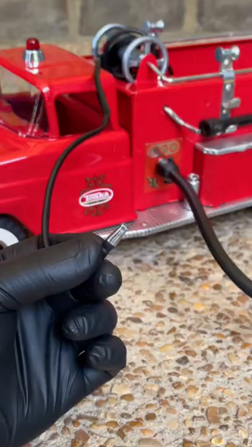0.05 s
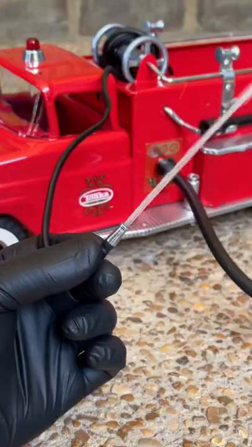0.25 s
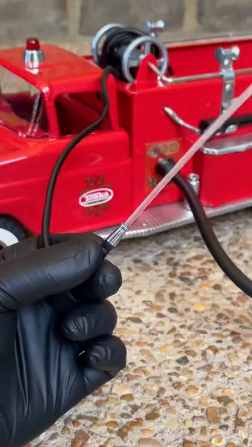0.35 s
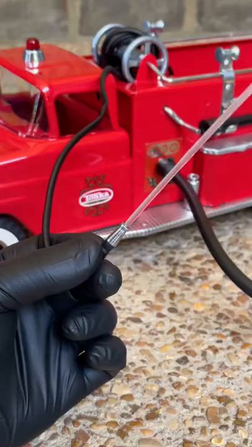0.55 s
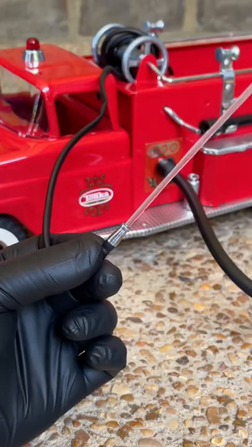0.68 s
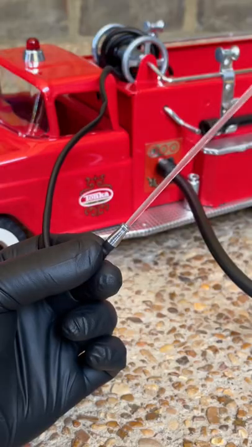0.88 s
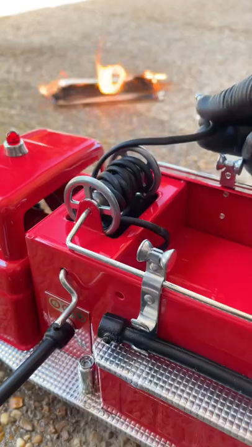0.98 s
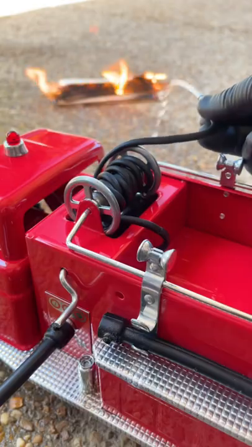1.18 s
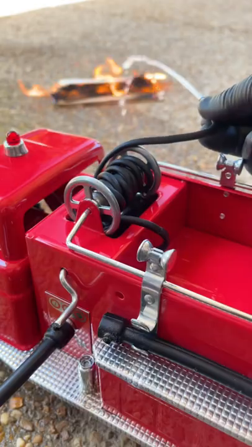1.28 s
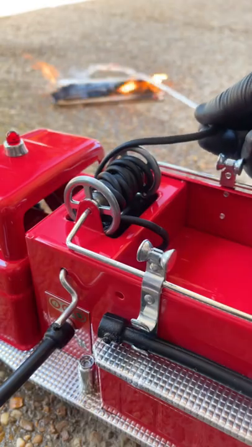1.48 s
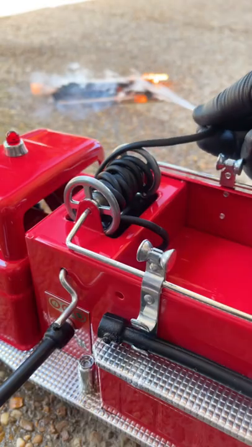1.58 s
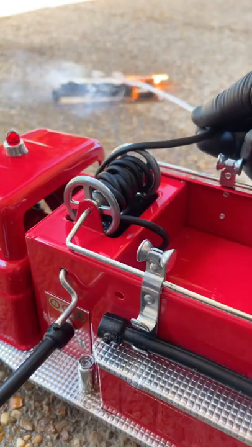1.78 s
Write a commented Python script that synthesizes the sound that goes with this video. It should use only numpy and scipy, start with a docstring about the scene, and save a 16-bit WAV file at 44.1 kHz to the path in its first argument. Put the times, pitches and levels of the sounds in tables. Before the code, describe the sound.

A thin water jet hisses and spits close by from a toy hose, over a low outdoor rumble. The nozzle clacks at 0.2 and 0.5 seconds, with a scrape and metal rattle between. At 0.9 the spray cuts to quiet. A short whistling spurt comes at 1.25, then drops spatter on concrete and, from 1.5, sizzle on a small wood fire with tiny steam pops.

```python
"""Outdoors, over a low rumble, a toy fire truck squirts water. Close by, a thin jet hisses and spits
while the nozzle clacks twice, with a scrape of the hose and a metal rattle in between.
Then we listen from behind the truck: a quiet moment, a whistling spurt as water pushes air out,
and drops spattering on concrete and sizzling on a small wood fire.
Two closely spaced microphone openings (ports) hear it all as left and right."""
import sys
import numpy as np
from scipy import signal
from scipy.fft import rfft, irfft
from scipy.io import wavfile
from scipy.ndimage import uniform_filter1d

SR = 44100
rng = np.random.default_rng(int(sys.argv[2]) if len(sys.argv) > 2 else 0)


def master(y):
    """Save y as 16-bit WAV."""
    cut = np.clip(np.atleast_2d(y).T, -1, 1)
    pcm = np.round(cut * 32767)  # scale
    wavfile.write(sys.argv[1], SR, pcm.astype(np.int16))


N = 81585

# tone of a steam pop and of the spurt's tick (frequency [Hz], level [dB])
POP_TONE = [(600, 0), (1400, 0), (2500, -25), (4200, -5), (6000, -2.5), (8000, 4.5), (11000, 5.5),
            (15500, -13)]
OPPOSITE = np.array([[1], [-1]])  # pushes on the left while pulling on the right


def amp(db):
    """Turn decibels into a gain to multiply by."""
    return 10 ** (np.asarray(db) / 20)


def clock():
    """Time of every sample in seconds."""
    return np.arange(N) / SR


def unit(x):
    """Scale a sound to an average power of 1."""
    return x / np.sqrt(np.mean(x ** 2))


def noise():
    """White noise: an even hiss."""
    return rng.standard_normal(N)


def curve(rows, axis=1):
    """One column of a timed table, joined by straight lines."""
    rows = np.array(rows)
    return np.interp(clock(), rows[:, 0], rows[:, axis])


def across(rows):
    """Spread a table of (frequency [Hz], value) over all frequencies."""
    hz, value = np.array(rows).T
    all_hz = np.arange(N + 1) * SR / (2 * N)
    return np.interp(np.log(all_hz + 1), np.log(hz), value)


def colour(x, tone):
    """Give a sound a tone of (frequency [Hz], level [dB]) points, then a power of 1."""
    bass_cut = (tone[0][0] / 4, tone[0][1] - 40)
    cepstrum = irfft(across([bass_cut] + list(tone)) * np.log(10) / 20)
    # fold the filter so that it never rings before the sound arrives
    cepstrum[1:N] *= 2
    cepstrum[N + 1:] = 0
    response = np.exp(rfft(cepstrum))
    return unit(irfft(rfft(x, 2 * N) * response)[:N])


def resonances(rows):
    """Narrow bands of noise, each heard as a rough pitch."""
    out = 0
    for hz, width, db in rows:
        b, a = signal.iirpeak(hz, hz / width, fs=SR)
        band = signal.lfilter(b, a, signal.lfilter(b, a, noise()))
        out += amp(db) * unit(band)
    return out


def wander(hz):
    """A smooth random drift, typically 1 up or down."""
    size = max(2, int(SR / hz))
    return unit(uniform_filter1d(uniform_filter1d(noise(), size), size))


def grains(per_s, spread_db, hiss):
    """Tiny clicks of uneven size over some smooth hiss."""
    clicks = (rng.random(N) < per_s / SR) * np.sign(noise())
    sizes = amp(spread_db * np.minimum(rng.exponential(size=N), np.pi))
    return unit(clicks * sizes) + hiss * noise()


def fade(start, t60):
    """Start suddenly, then die away by 60 dB in t60 seconds (the fade time)."""
    age = clock() - start
    return (age >= 0) * np.exp(-np.log(1000) * np.maximum(age, 0) / t60)


def bursts(rows, tone, t60):
    """A fading puff of noise for each (time [s], level [dB])."""
    return colour(noise(), tone) * sum(amp(db) * fade(start, t60) for start, db in rows)


def ring(start, notes, contact_s=0.00029):
    """A struck thing's notes build up during the contact; neighbours swing opposite ways."""
    age = np.maximum(clock() - start, 0)
    swing = sum((-1) ** k * amp(db) * fade(start, t60) * np.sin(2 * np.pi * hz * age)
                for k, (hz, db, t60) in enumerate(notes))
    return swing * (1 - np.exp(-age / contact_s))


def strikes(rows, notes, pitch_spread):
    """A ring for each (time [s], level [dB]), tuned a little differently every time."""
    tunings = 1 + pitch_spread * rng.standard_normal((len(rows), len(notes)))
    out = 0
    for (start, level), tuning in zip(rows, tunings):
        retuned = [(hz * ratio, db, t60) for (hz, db, t60), ratio in zip(notes, tuning)]
        out += amp(level) * ring(start, retuned)
    return out


def ports(x, lag):
    """Left and right: the right port hears each frequency shifted in time."""
    right = irfft(rfft(x, 2 * N) * np.exp(-1j * across(lag)))[:N]
    return np.array([x, right])


def wide(source, lag, sides_db):
    """A spread-out source: most arrives from one direction, a little from the sides."""
    return ports(source(), lag) + amp(sides_db) * ports(source(), lag) * OPPOSITE


def open_air():
    """A faint rush of air from all around."""
    # tone of the air (frequency [Hz], level [dB])
    tone = [(200, -6.5), (450, -0.5), (900, 1.5), (2000, -17), (6000, -21), (14000, -28)]
    return amp(-78.5) * colour(noise(), tone) * OPPOSITE


def rumble(behind_truck):
    """Outdoor rumble with the hum of a distant machine."""
    # rumble beside and behind the truck (frequency [Hz], level [dB])
    near_tone = [(25, -16.7), (55, 5), (85, -1), (125, 0.5), (190, -8), (260, -8), (500, -21), (850, -27),
                 (1300, -43.5), (2500, -40)]
    far_tone = [(25, -38), (55, -8.5), (100, -3.5), (180, -1.5), (260, -9.5), (370, -8.5), (550, -19),
                (1000, -27.5), (2200, -36.3), (3800, -38), (7000, -42), (15000, -52.5)]
    # hum at the same two spots (frequency [Hz], width [Hz], level [dB])
    near_hum = [(58.5, 24, -70), (124.66, 6.3, -68), (264.9, 26, -70), (840, 210, -78)]
    far_hum = [(179, 14, -69.5), (363.3, 14, -78)]
    tone, hum = (far_tone, far_hum) if behind_truck else (near_tone, near_hum)
    return amp(-63) * colour(noise(), tone) + resonances(hum)


def scrape():
    """Hand and hose stick and slip on the toy, and bump softly against it."""
    # tones of rubbing and bumping (frequency [Hz], level [dB])
    rub_tone = [(90, -16), (200, 4), (400, 2.5), (600, -0.5), (1200, -2), (1600, -6.5), (2400, -1),
                (3200, -10), (4000, -8.5), (4800, -15), (11000, -15), (14000, -41)]
    bump_tone = [(150, 9), (220, 2.5), (400, 7.5), (650, -5.5), (1200, -1.5), (1700, -7), (2400, -13),
                 (3500, -29), (8000, -36)]
    # loudness of the rubbing, and each bump (time [s], level [dB])
    rub_level = [(0, -63.5), (.045, -55), (.09, -60), (.125, -61.5), (.183, -66.5), (.19, -46.5),
                 (.225, -46.5), (.255, -41), (.278, -54.5), (.296, -49), (.322, -66), (.35, -56),
                 (.385, -61), (.412, -68), (.44, -63.5), (.5, -58), (.58, -72)]
    bumps = [(.046, -60), (.081, -54.5), (.396, -50), (.405, -48.5), (.412, -53.5), (.421, -63)]
    rub = colour(grains(per_s=2500, spread_db=6.7, hiss=0.53), rub_tone)
    return rub * amp(curve(rub_level)) + bursts(bumps, bump_tone, t60=0.053)


def splash():
    """Drops spatter on concrete over the low drumming of the stream."""
    # tones of spatter and drumming (frequency [Hz], level [dB])
    spatter_tone = [(500, -9), (850, -2.5), (1400, -0.5), (2500, -11.5), (3100, -4), (3600, -12),
                    (4100, -1), (5400, -14), (7800, -4), (9000, -4), (11000, -1.5), (15500, -1)]
    drum_tone = [(50, -27), (90, 10.5), (250, 4.5), (500, -3.5), (900, -7), (2000, -22)]
    # loudness of both (time [s], level [dB])
    level = [(1.24, -79.5), (1.256, -55), (1.3, -62), (1.35, -59.5), (1.362, -53), (1.4, -58), (1.46, -55),
             (1.85, -60.5)]
    spatter = colour(grains(per_s=3500, spread_db=2.4, hiss=0.57), spatter_tone)
    drumming = colour(grains(per_s=600, spread_db=4.2, hiss=0.64), drum_tone)
    return (spatter + amp(-10) * drumming) * amp(curve(level))


def sizzle(start_s=1.465):
    """Water boils on the embers, and the wood sounds hollow where the jet hits it."""
    # tone of the boiling (frequency [Hz], level [dB])
    tone = [(500, -12), (900, -13), (1150, -12), (1400, -28), (2100, -18), (3300, -19), (4400, -6),
            (5500, -13.5), (7000, -8), (8500, -4.5), (10900, 2.5), (12200, -0.5), (13500, -1.5),
            (15200, -1)]
    # hollow notes of the wood (frequency [Hz], width [Hz], level against the boiling [dB])
    wood_notes = [(1414, 130, -20.5), (905, 150, -26), (7930, 250, -26.5)]
    # loudness of both (time [s], level [dB])
    level = [(1.465, -48), (1.53, -46.5), (1.565, -43), (1.615, -48.5), (1.66, -47), (1.73, -49.5),
             (1.85, -47.5)]
    wood = resonances(wood_notes)
    loudness = amp(curve(level) + 1.4 * wander(hz=98)) * (clock() > start_s)
    boiling = colour(grains(per_s=2200, spread_db=3.3, hiss=0.91), tone)
    return (boiling + wood) * loudness


def steam_pops():
    """Small pockets of steam burst and ring briefly."""
    # each pop (time [s], level [dB])
    pops = [(1.333, -69), (1.4978, -44.5), (1.538, -43), (1.558, -40), (1.5635, -43.5), (1.5775, -52),
            (1.5985, -53), (1.655, -41), (1.665, -42.5)]
    # ring of a pocket (frequency [Hz], level [dB], fade time [s])
    notes = [(1455, -12.5, 0.028), (3830, -13, 0.031), (4410, -5.5, 0.017), (7700, -6, 0.0095)]
    return bursts(pops, POP_TONE, t60=0.013) + strikes(pops, notes, pitch_spread=0.039)


def dousing():
    """Water lands on the concrete, then on the fire."""
    return splash() + sizzle() + steam_pops()


def spurt():
    """Water pushes air out of the nozzle: a puff, a tick and a short rising whistle."""
    # path of the whistle (time [s], pitch [Hz], level [dB])
    glide = [(1.25, 1040, -76.5), (1.257, 1110, -49.5), (1.263, 1125, -45.5), (1.27, 1120, -49.5),
             (1.281, 1137, -61), (1.3, 1147, -62), (1.325, 1120, -77)]
    # tone of the puff (frequency [Hz], level [dB])
    puff_tone = [(400, -15), (800, 8.5), (1700, 6.5), (2200, -24), (3100, 6.5), (4000, -19), (12000, -16)]
    pitch_hz = curve(glide) * (1 + 0.0027 * wander(hz=170))
    phase = 2 * np.pi * np.cumsum(pitch_hz) / SR
    octave = amp(-21.5) * np.sin(2 * phase)
    sounding = (clock() > glide[0][0]) & (clock() < glide[-1][0])
    whistle = sounding * amp(curve(glide, axis=2)) * (np.sin(phase) + octave)
    puff = amp(-55.5) * colour(noise(), puff_tone) * fade(start=1.2448, t60=0.12)
    tick = amp(-42.5) * colour(noise(), POP_TONE) * fade(start=1.2512, t60=0.022)
    return whistle + puff + tick


def jet():
    """The thin jet breaks into droplets, fluttering and spitting air."""
    # tones of spray and spits (frequency [Hz], level [dB])
    spray_tone = [(1300, -29.5), (2500, -23), (4000, -15.5), (5300, -12), (6500, 1), (7700, -4.5),
                  (8700, -1), (9700, 2.5), (11000, -6.5), (12800, -11), (14000, -31.5), (15700, -33)]
    spit_tone = [(600, -21), (2000, -12), (4500, -4), (6700, 6.5), (8000, 3), (10500, 1), (13000, -9),
                 (15000, -29)]
    # loudness of the spray, and each spit (time [s], level [dB])
    spray_level = [(0, -55.5), (.03, -57), (.07, -56), (.11, -58.5), (.16, -59.5), (.4, -58), (.56, -57.5),
                   (.597, -51), (.62, -61.5), (.69, -58), (.74, -60), (.8, -56.5), (.93, -58.5)]
    spits = [(.0202, -45.5), (.0262, -44), (.1312, -44.5), (.1868, -47), (.7572, -48.5), (.8558, -42.5),
             (.86, -61), (.926, -51)]
    spray = colour(grains(per_s=3500, spread_db=4.5, hiss=0.6), spray_tone)
    flutter_db = 2.7 * wander(hz=120)
    return spray * amp(curve(spray_level) + flutter_db) + bursts(spits, spit_tone, t60=0.037)


def rattle():
    """A loose metal part clinks each time it touches the toy."""
    # each touch (time [s], level [dB])
    clinks = [(.2345, -54), (.2458, -34), (.2532, -39.5), (.259, -41), (.2635, -57.5), (.2848, -49.5),
              (.294, -46), (.2975, -48), (.3472, -42.5)]
    # ring of the part (frequency [Hz], level [dB], fade time [s])
    notes = [(2320, -6, .065), (3980, -14, .03), (6230, -3, .045), (6400, -4, .035), (9120, -4, .03),
             (9320, -3, .03)]
    return strikes(clinks, notes, pitch_spread=0.0055)


def nozzle():
    """Each clack cracks, rings the tin body and echoes off a wall; latching adds a hollow thud."""
    # each clack (time [s], ring level [dB], crack level [dB], valve [0 opening, 1 latching])
    clacks = [(0.1873, -56, -42.5, 0), (0.2014, -26, -22.5, 0), (0.2068, -48.5, -27.5, 0),
              (0.4702, -28, -31, 1)]
    # ring of nozzle and body (frequency [Hz], opening [dB], latching [dB], fade time [s])
    body = [(272, -20.5, -10, 0.062), (806, -16.5, -26, 0.086), (1108, -21.5, -11.5, 0.052),
            (1251, -19, -15, 0.051), (1480, -35, -15, 0.027), (1876, -1, -5.5, 0.055),
            (1990, -2.5, -17.5, 0.063), (2475, -19.5, -6.5, 0.045), (2650, -13.5, -12, .06),
            (3340, -8.5, -44, 0.019), (3835, -1, -21, .04), (4960, -17.5, -17, .04), (5220, -9, -23, .05),
            (5670, -16, -19, 0.032), (6530, -18, -9.5, 0.0426)]
    # tones of crack, echo and thud (frequency [Hz], level [dB])
    crack_tone = [(150, -19.5), (350, -1.5), (650, -15), (1200, -12.5), (1900, 0.5), (3000, -5), (3800, -5),
                  (4700, -13.8), (5400, -9.5), (7500, -14), (10000, -2.5), (12500, -29.5), (15000, -39.5)]
    echo_tone = [(120, -11.5), (280, 0.5), (600, -11.5), (1200, -0.5), (2400, -1.5), (3300, -11.5),
                 (5000, -10.5), (12000, -28)]
    thud_tone = [(200, -14), (290, 7.5), (600, -21), (1100, 6), (1500, -2), (2000, 2.5), (2600, 2),
                 (3400, -19), (8000, -37)]
    out = 0
    for start, ring_db, crack_db, latching in clacks:
        notes = [(hz, latch_db if latching else open_db, t60) for hz, open_db, latch_db, t60 in body]
        crack = colour(noise(), crack_tone) * fade(start, t60=0.028)
        echo = amp(-17) * colour(noise(), echo_tone) * fade(start, t60=0.25)
        out += amp(ring_db) * ring(start, notes) + amp(crack_db) * (crack + echo)
        if latching:
            out += amp(-38) * colour(noise(), thud_tone) * fade(start, t60=0.058)
    return out


def scene(move_at_s=0.932, move_takes_s=0.022):
    """We listen beside the nozzle first, then behind the truck, facing the fire."""
    # how far the right port trails the left at each spot (frequency [Hz], phase lag [radians])
    near_lag = [(20, 0), (2000, 0), (3000, .45), (4000, .7), (4500, 1.5), (4900, 3.1), (5300, 5.5),
                (5900, 6.2), (7000, 7.6), (8000, 8.6), (9000, 9.3), (10000, 10), (11000, 11.2),
                (12000, 12.5), (15000, 12.7)]
    far_lag = [(20, 0), (700, 0), (1150, -.5), (1800, 0), (3500, .1), (4600, 1.2), (5600, 0), (6400, .8),
               (7000, 3), (7500, 5), (8400, 6.1), (9200, 6.4), (12000, 8.8), (13000, 9.4), (14500, 9.5),
               (15700, 10.3)]
    near = ports(rattle() + nozzle() + rumble(behind_truck=False), near_lag)
    near += wide(jet, near_lag, sides_db=-18)
    near += wide(scrape, near_lag, sides_db=-13)
    far = ports(spurt() + rumble(behind_truck=True), far_lag)
    far += wide(dousing, far_lag, sides_db=-15)
    moved = np.clip((clock() - move_at_s) / move_takes_s, 0, 1)
    return near * (1 - moved) ** 2 + far * np.sqrt(moved) + open_air()


def record(dry, top_hz=15760):
    """A steep filter removes the very highest treble."""
    return signal.sosfilt(signal.ellip(10, .2, 70, top_hz, fs=SR, output="sos"), dry)


dry = scene()
out = record(dry)
master(out)
```